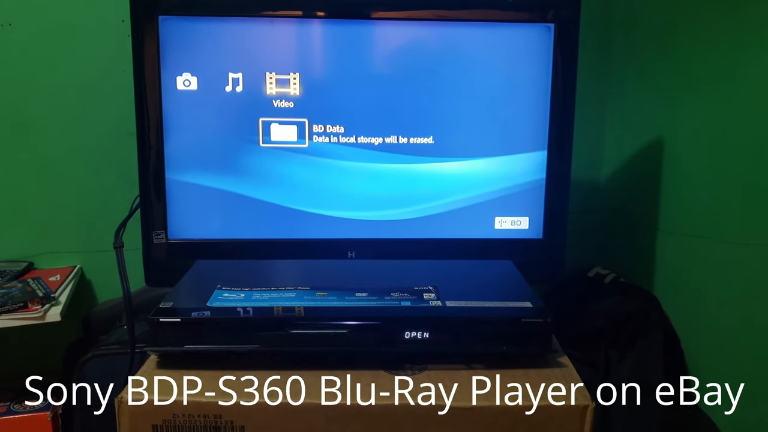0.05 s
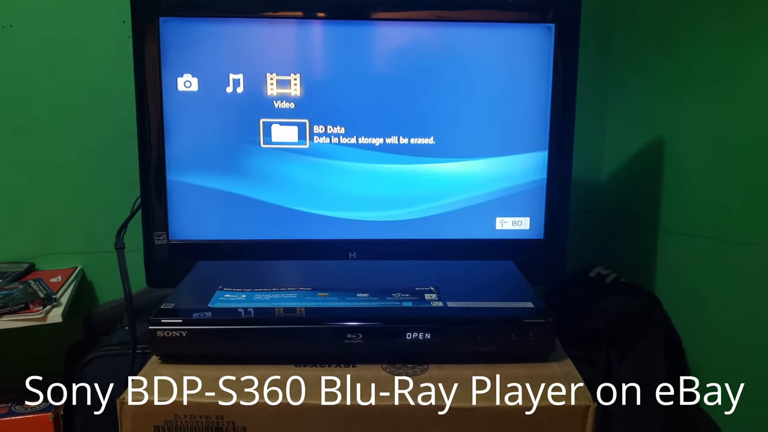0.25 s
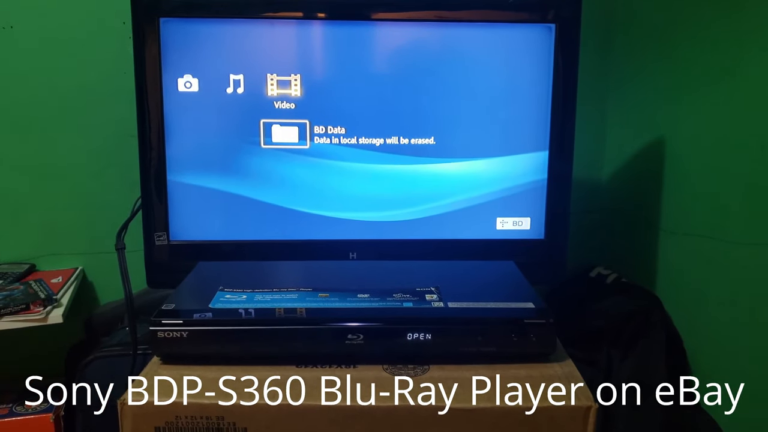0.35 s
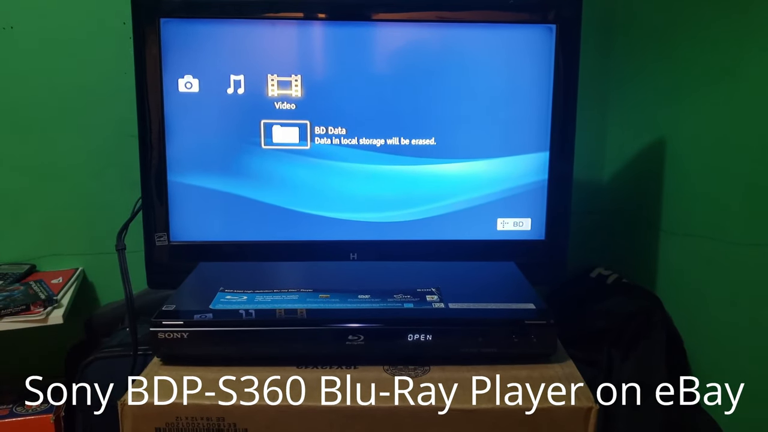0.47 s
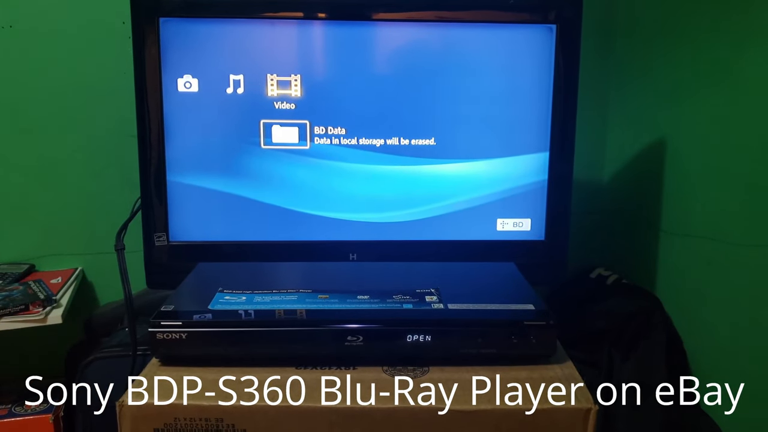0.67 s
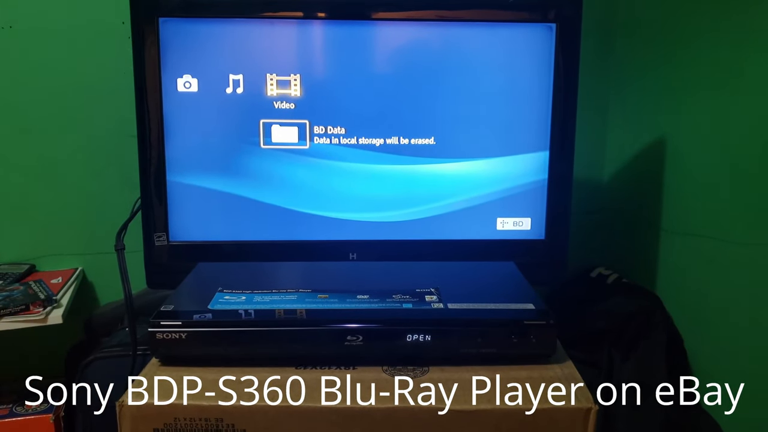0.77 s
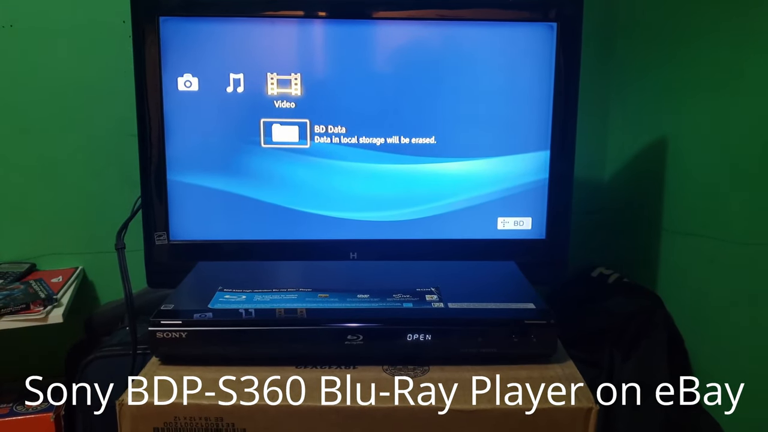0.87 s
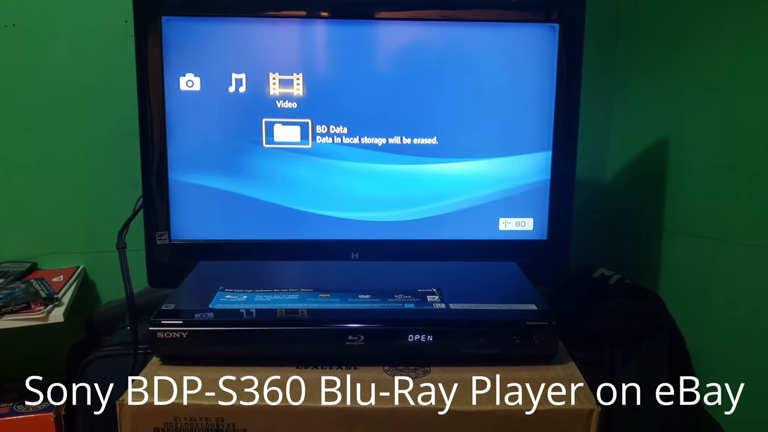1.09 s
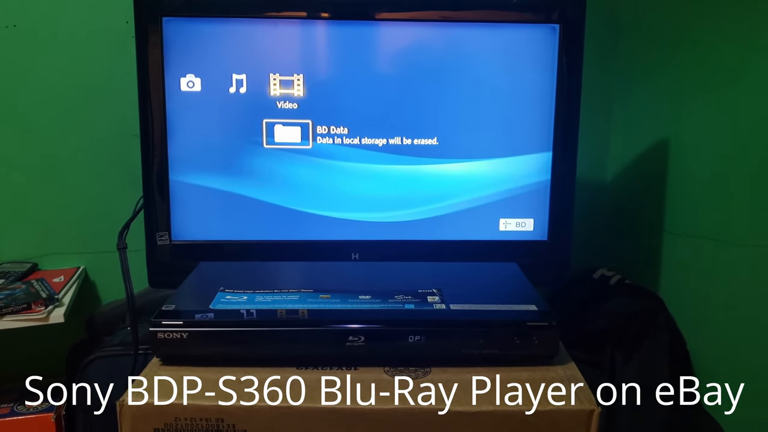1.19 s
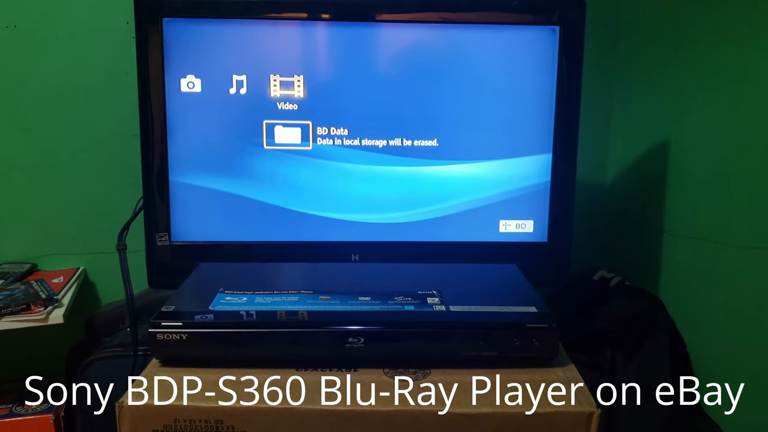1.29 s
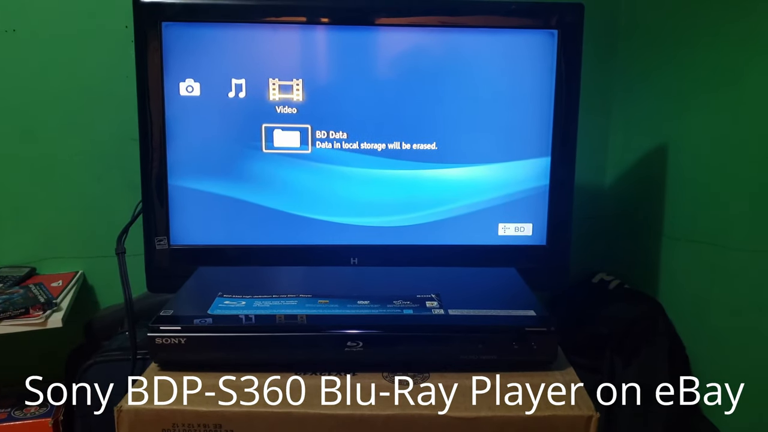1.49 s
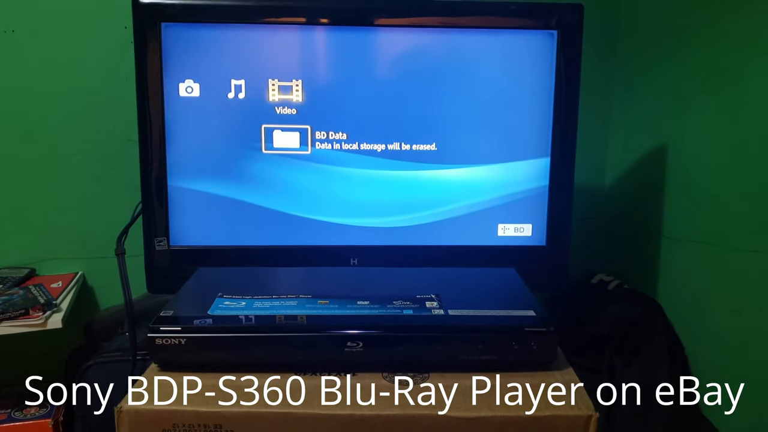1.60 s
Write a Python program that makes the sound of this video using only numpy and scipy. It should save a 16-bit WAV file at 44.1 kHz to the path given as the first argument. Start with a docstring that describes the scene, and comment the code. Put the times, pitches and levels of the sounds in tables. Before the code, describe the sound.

A disc player's tray rattles inward and shuts with a quick cluster of plastic clacks and a low boom. A light tick follows, then a small motor whirs and judders, over faint hum and hiss in a small room.

```python
"""A motor draws the disc tray into a player in a small room. The tray rattles, scrapes and knocks home,
and the clamp drops; each blow rings the case, which booms on the cardboard box under it. A light tick
follows, then the pickup motor whirs and judders against its stop.
Mains hum and a faint hiss go on throughout."""
import sys
import numpy as np
from scipy import signal
from scipy.io import wavfile
from scipy.ndimage import uniform_filter1d

SR = 44100
rng = np.random.default_rng(int(sys.argv[2]) if len(sys.argv) > 2 else 0)


def transcribe(u):
    """Save the signal u as a 16-bit wav file named by the first command-line argument.

    u: samples, shape (n,) or (channels, n), limited to [-1, 1]; the rate is SR.
    q: integer samples, one column per channel.
    """
    v = np.clip(np.atleast_2d(u).T, -1, 1)
    q = np.round(v * 32767).astype(np.int16)
    wavfile.write(sys.argv[1], SR, q)


N = 72765
T = np.arange(N) / SR
EDGES = 28 * 2 ** (np.arange(29) / 3)   # third-octave bands, Hz
CENTRES = np.sqrt(EDGES[1:] * EDGES[:-1])

# Stereo width of diffuse sound. Each row: frequency in Hz, left-right likeness from 0 to 1.
LIKENESS = [(100, .99), (250, .97), (500, .92), (1000, .45), (2000, .2), (5000, 0), (14000, 0)]
# Stereo balance. Each row: frequency in Hz, left over right in dB.
BALANCE_DB = [(100, 3), (3000, -1.9), (8000, 1), (14000, 2.5)]


def from_db(db):
    """Decibels to gain."""
    return 10 ** (np.asarray(db) / 20)


def rms_one(x):
    """Scale to unit power."""
    return x / np.sqrt(np.mean(x ** 2) + 1e-20)


def at_hz(points, hz):
    """Read a curve on a log-frequency axis."""
    f, v = np.transpose(points)
    return np.interp(np.log(hz), np.log(f), v)


def pan(db):
    """Left and right gains of constant power."""
    return rms_one(from_db([[db / 2], [-db / 2]]))


def fader(curve):
    """Gain along a curve of seconds and dB, silent outside it."""
    return from_db(np.interp(T, *np.transpose(curve), left=-np.inf, right=-np.inf))


def dying(start, rise, t60):
    """Envelope that rises from a start time and dies away."""
    age = np.maximum(T - start, 0)
    return (1 - np.exp(-age / rise)) * np.exp(-np.log(1000) * age / t60)


def wander(points):
    """Smooth drift through a number of random points."""
    return signal.resample(rng.standard_normal(points), N)


def sine(hz):
    """Unit-power tone that follows a moving pitch."""
    return np.sqrt(2) * np.sin(2 * np.pi * np.cumsum(hz) / SR)


def stereo(pair, alike):
    """Mix two unrelated signals into left and right with a given likeness."""
    alike = np.clip(alike, -.99, .99)
    mid = np.sqrt((1 + alike) / 2) * pair[0]
    side = np.sqrt((1 - alike) / 2) * pair[1]
    return np.array([mid + side, mid - side])


def noise_bands(least_alike=0):
    """Third-octave bands of stereo noise, unit power each."""
    white, bands = rng.standard_normal((2, 2, N + SR // 4)), []
    for k, hz in enumerate(CENTRES):
        sos = signal.butter(2, EDGES[k:k + 2] * [.97, 1.03], "band", fs=SR, output="sos")
        pair = signal.sosfilt(np.vstack([sos, sos]), white[k % 2])[:, -N:]
        alike = max(at_hz(LIKENESS, hz), least_alike)
        bands.append(rms_one(stereo(pair, alike)) * pan(at_hz(BALANCE_DB, hz)))
    return bands


def coloured(colour):
    """Steady stereo noise with a given spectrum."""
    return sum(from_db(at_hz(colour, hz)) * band for hz, band in zip(CENTRES, noise_bands()))


def mechanism(effort, colour, resonances, contacts_per_s, grain):
    """Uneven contacts excite resonances and roughen a rubbing noise; both follow the effort."""
    travel = np.cumsum(contacts_per_s * (1 + rng.standard_normal(N))) / SR
    contacts = np.diff(np.floor(np.maximum.accumulate(travel)), prepend=0)
    clicks = contacts * from_db(3.5 * rng.standard_normal((2, N))) * rng.choice([-1, 1], (2, N))
    roughness = rms_one(uniform_filter1d(np.abs(clicks[0]), size=50))
    out = coloured(colour) * rms_one(1 + grain * roughness)
    for hz, width_hz, db in resonances:
        r = np.exp(-np.pi * width_hz / SR)
        resonator = [1, 0, -1, 1, -2 * r * np.cos(2 * np.pi * hz / SR), r * r]
        pair = signal.sosfilt([resonator, resonator], clicks + 1e-18)
        out = out + from_db(db) * rms_one(stereo(pair, at_hz(LIKENESS, hz)))
    return fader(effort) * out


def ring(strikes, hz, t60):
    """One mode fed by strikes (seconds, dB); higher modes reach the two sides more out of step."""
    apart = np.arccos(at_hz(LIKENESS, hz)) * rng.choice([-.5, .5])
    phase = rng.uniform(0, 2 * np.pi) + apart * np.array([[1], [-1]])
    energy = sum((from_db(db) * dying(start, 1 / hz, t60)) ** 2 for start, db in strikes)
    return np.sqrt(energy) * np.sin(2 * np.pi * hz * T + phase)


def blows(hits, colour, room_db):
    """Each hit is a short crack in every band, followed by the room's tail."""
    # Room decay. Each row: frequency in Hz, t60 in seconds.
    room_t60 = [(130, 0.36), (300, 0.81), (500, 0.39), (1400, 0.24), (4000, .29), (14000, 0.3)]
    # Reverb send. Each row: frequency in Hz, dB against the crack before room_db is added.
    room_send = [(200, -9.5), (1400, -9), (3500, -9), (8000, -10.5), (14000, -19.5)]
    right_lag_s, room_rise_s = .00013, .0025
    out = 0
    for hz, near, far in zip(CENTRES, noise_bands(least_alike=.78), noise_bands()):
        near = np.array([near[0], np.interp(T - right_lag_s, T, near[1])])
        rise = 2.1 / hz   # low bands swell later and last longer
        crack = tail = 0
        for start, tone, t60, pan_db in hits:
            gain = from_db(at_hz(colour, hz) + at_hz(tone, hz))
            crack = crack + (gain * pan(pan_db) * dying(start, rise, t60 + 10 * rise)) ** 2
            tail = tail + (gain * dying(start, room_rise_s + rise, at_hz(room_t60, hz))) ** 2
        out = out + near * np.sqrt(crack) + far * np.sqrt(tail) * from_db(at_hz(room_send, hz) + room_db)
    return out


def hum_and_hiss():
    """Wavering mains hum over a bed of room tone and hiss."""
    # Mains partials. Each row: frequency in Hz, level in dB.
    partials = [(59.6, -75), (120, -71)]
    # The noise bed. Each row: frequency in Hz, dB per third octave.
    bed = [(30, -67.5), (55, -80.5), (100, -81), (200, -81), (320, -86.5), (500, -88), (800, -94.5),
           (2000, -91), (3000, -91), (3800, -88), (5000, -93.5), (9000, -97.5), (12500, -87.5),
           (15500, -84)]
    waver_db = 4.3 * wander(24)
    hum = sum(np.sqrt(2) * from_db(db - waver_db) * np.sin(2 * np.pi * (hz * T + rng.random()))
              for hz, db in partials)
    return coloured(bed) + hum * pan(at_hz(BALANCE_DB, partials[0][0]))


def tray_drive():
    """Gear teeth rattle the tray in while the motor's unsteady tone sags under load."""
    # Drive effort. Each row: time in seconds, level in dB.
    effort = [(0, -97), (.05, -84.5), (.072, -71), (.079, -63.5), (.105, -64.5), (.135, -69), (.2, -73),
              (.25, -58.5), (.33, -76), (.36, -88)]
    # Sliding noise. Each row: frequency in Hz, relative dB per third octave.
    colour = [(60, -18), (200, -3.5), (320, -8), (460, 2), (700, -14), (1100, -4), (1750, -4.5),
              (2400, -23), (3500, -11.5), (5000, -14), (9000, -23), (15000, -17)]
    # Resonances the teeth excite. Each row: frequency in Hz, width in Hz, relative dB.
    resonances = [(1026, 44, -1.5), (1251, 26, -7), (1720, 61, -9), (3240, 830, -9)]
    # The slowing motor. Each row: time in seconds, pitch in Hz.
    pitch = [(.06, 479), (.12, 448), (.2, 419.8)]
    hz = np.interp(T, *np.transpose(pitch)) + 28 * wander(200)
    tone = from_db(-.5) * fader(effort) * sine(hz)
    return mechanism(effort, colour, resonances, contacts_per_s=420, grain=.083) + tone


def case_boom():
    """The case rocks on its cardboard box in one low mode."""
    # Pushes on the case. Each row: start in seconds, level in dB, t60 in seconds.
    pushes = [(.085, -51, 0.92), (0.257, -41, 0.82), (0.34, -33, 0.7), (0.687, -37, 0.14),
              (1.2, -47.5, 0.45)]
    hz, rise_s = 61.9, .057
    swing = np.sqrt(sum((from_db(db) * dying(start, rise_s, t60)) ** 2 for start, db, t60 in pushes))
    return swing * np.sin(2 * np.pi * hz * T) * pan(at_hz(BALANCE_DB, hz))


def tray_knocks():
    """The tray hits home and the clamp drops; every blow sets the case ringing."""
    # Tray and clamp blows. Each row: start in seconds, level in dB, bass, treble and top EQ in dB,
    # base t60 of the crack in seconds, left over right in dB.
    knocks = [(0.2163, -33, -18, -15, -13.5, 0.0077, 9), (0.2553, -35, -3, -0.5, 3, 0.028, 17.5),
              (0.2604, -35.5, 0, 1.5, -9, 0.023, -13.5), (0.2655, -42, 2, -4, -8, 0.066, 4),
              (0.323, -45.5, 7.5, -5, -17.5, 0.088, 2.5), (0.34, -31.5, -8, -16, -7.5, 0.033, -0.5),
              (.3455, -45, -14, -8, -18.5, 0.032, 10)]
    # The EQ points in Hz: bass, mid, treble, top.
    eq_hz = (450, 1400, 4000, 10000)
    # Struck plastic. Each row: frequency in Hz, relative dB per third octave.
    plastic = [(60, -15.5), (120, -25), (190, -9), (240, -15), (310, -16), (470, -2), (700, -11),
               (1100, -5.5), (1800, 0), (2300, -9.5), (3200, -2.5), (4500, -7), (7500, -10), (11000, -10),
               (15000, -7)]
    # Modes of tray and case. Each row: frequency in Hz, relative dB, t60 in seconds.
    modes = [(184, -6, .3), (233, -2, .32), (407, 0, .3), (480, -1, .25), (569, -8, .32), (738, -7, .16),
             (1032, -1, .2), (1081, -5, .2), (1120, -2, .18), (1217, 0, .16), (1460, -5, .18),
             (1688, -3, .16), (1760, -5, .16), (1938, -3, .17), (2199, -10, .17), (2560, -9, .18),
             (3080, -7, .2), (3423, -4, .2)]
    ring_db, spread_db = -11.5, 1.5
    hits = [(start, list(zip(eq_hz, db + np.array([bass, 0, treble, top]))), t60, pan_db)
            for start, db, bass, treble, top, t60, pan_db in knocks]
    ringing = 0
    for hz, db, t60 in modes:
        strikes = [(start, at_hz(tone, hz) + db + ring_db + spread_db * rng.standard_normal())
                   for start, tone, _, _ in hits]
        ringing = ringing + ring(strikes, hz, t60)
    return blows(hits, plastic, room_db=-4.5) + ringing


def tray_scrape():
    """The tray scrapes in tiny, fast slips between its first contact and the clack."""
    # Scraping effort. Each row: time in seconds, level in dB.
    effort = [(.219, -56), (.227, -51.5), (.232, -51.5), (.238, -44), (.245, -49.5), (.253, -52.5),
              (.27, -71)]
    # Friction noise. Each row: frequency in Hz, relative dB per third octave.
    colour = [(60, -23.5), (200, -17.5), (320, -16.5), (500, -7.5), (750, -12), (1150, 4.5), (1650, -18),
              (2300, -12), (3400, -4.5), (4600, -10.5), (5900, -4), (8000, -20), (15000, -31)]
    # Resonances the slips excite. Each row: frequency in Hz, width in Hz, relative dB.
    resonances = [(1120, 70, -4), (5700, 400, -11)]
    return mechanism(effort, colour, resonances, contacts_per_s=3400, grain=.79)


def light_tick():
    """A small, bright click with a thin ring."""
    # The click. Each row: frequency in Hz, relative dB per third octave.
    colour = [(100, -38.5), (1450, -46.5), (2000, -0.5), (2600, -9), (3400, 2), (5000, 2.5), (8000, -2.5),
              (11000, -9.5), (15000, 3)]
    # Its ring. Each row: frequency in Hz, level in dB, t60 in seconds.
    modes = [(2015, -70, 0.28), (3060, -66, 0.073), (4495, -63.5, 0.11)]
    start, flat_db, crack_t60, pan_db = .7042, -64, .05, 3
    click = blows([(start, [(1000, flat_db)], crack_t60, pan_db)], colour, room_db=6)
    return click + sum(ring([(start, db)], hz, t60) for hz, db, t60 in modes)


def pickup_motor():
    """The motor steps the pickup along its rail with a whir and a wavering whine."""
    # Motor effort. Each row: time in seconds, level in dB.
    effort = [(1.01, -85), (1.03, -76), (1.15, -76), (1.2, -74), (1.3, -75), (1.36, -93), (1.45, -87),
              (1.65, -91.5)]
    # The whir. Each row: frequency in Hz, relative dB per third octave.
    colour = [(80, -18), (200, -12.5), (330, -5.5), (500, -3), (660, -1.5), (900, -21), (2500, -25),
              (4000, -13), (5500, -31), (15000, -27)]
    # Resonances the steps excite. Each row: frequency in Hz, width in Hz, relative dB.
    resonances = [(3777, 79, -13), (3860, 57, -14.5)]
    whine = from_db(2) * fader(effort) * sine(hz=503 + 7 * wander(80))
    return mechanism(effort, colour, resonances, contacts_per_s=1300, grain=.22) + whine


def pickup_judder():
    """The pickup bumps against its stop in a fast, low judder."""
    # Push on the stop. Each row: time in seconds, level in dB.
    effort = [(1.185, -86), (1.205, -74), (1.235, -64), (1.275, -67.5), (1.31, -76.5), (1.36, -81),
              (1.5, -112)]
    # The rumble. Each row: frequency in Hz, relative dB per third octave.
    colour = [(40, -0.5), (65, 4), (110, -11.5), (200, -2.5), (320, -10.5), (500, 4), (700, -2),
              (950, -17.5), (1500, -8.5), (2200, -28.5), (3500, -20.5), (8000, -48)]
    # Resonances the bumps excite. Each row: frequency in Hz, width in Hz, relative dB.
    resonances = [(64, 32, -2), (235, 26, 5), (379, 48, -0.5)]
    return mechanism(effort, colour, resonances, contacts_per_s=250, grain=.033)


def scene():
    """The player loads its tray and moves its pickup over the hum and hiss."""
    return (hum_and_hiss() + tray_drive() + case_boom() + tray_knocks() + tray_scrape()
            + light_tick() + pickup_motor() + pickup_judder())


def record(dry):
    """The microphone sheds the deepest bass; the top is cut steeply."""
    low_cut = signal.butter(4, 46, "high", fs=SR, output="sos")
    high_cut = signal.ellip(10, .1, 70, 16200, fs=SR, output="sos")
    return signal.sosfilt(high_cut, signal.sosfilt(low_cut, dry))


dry = scene()
out = record(dry)
transcribe(out)
```